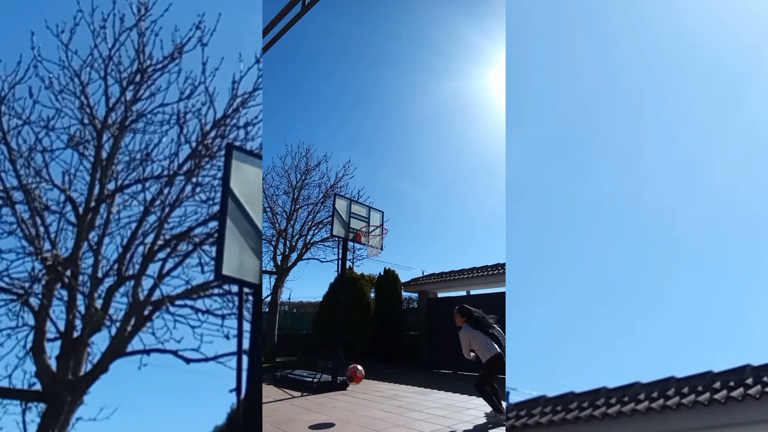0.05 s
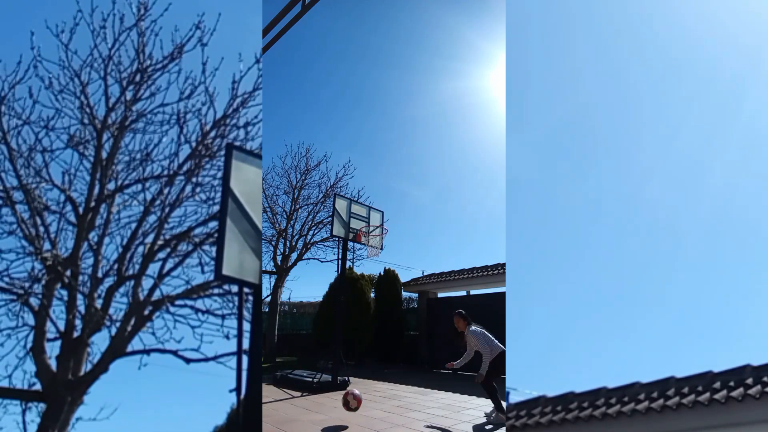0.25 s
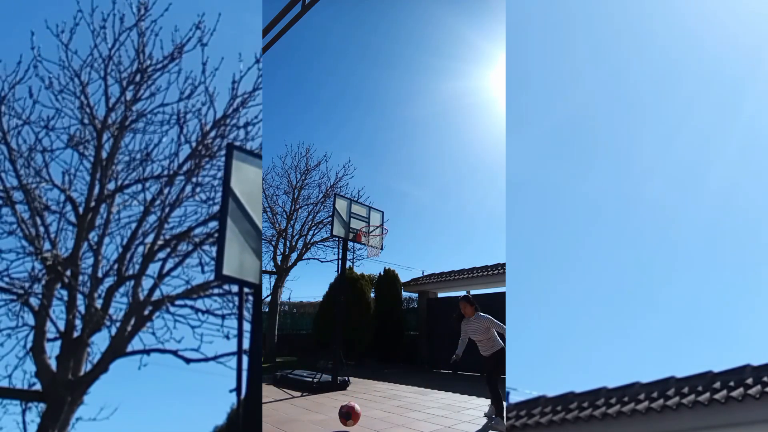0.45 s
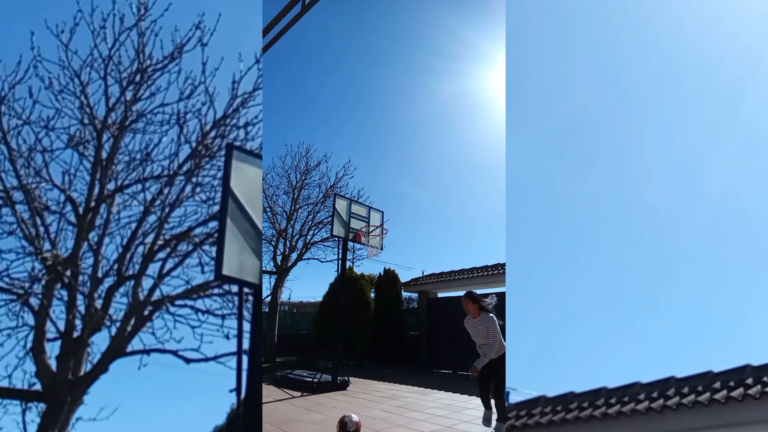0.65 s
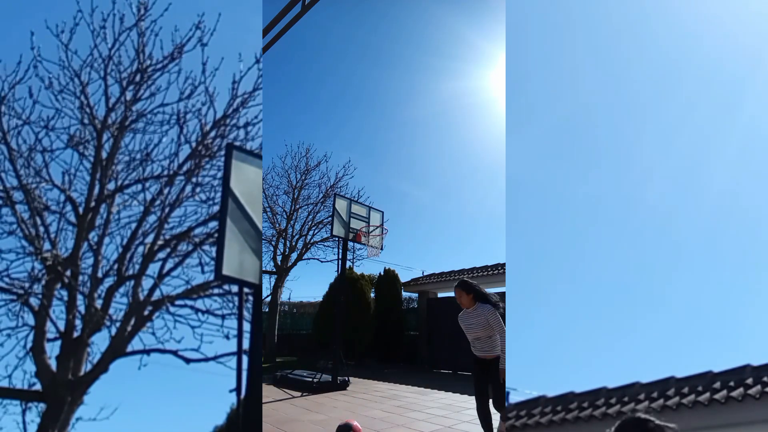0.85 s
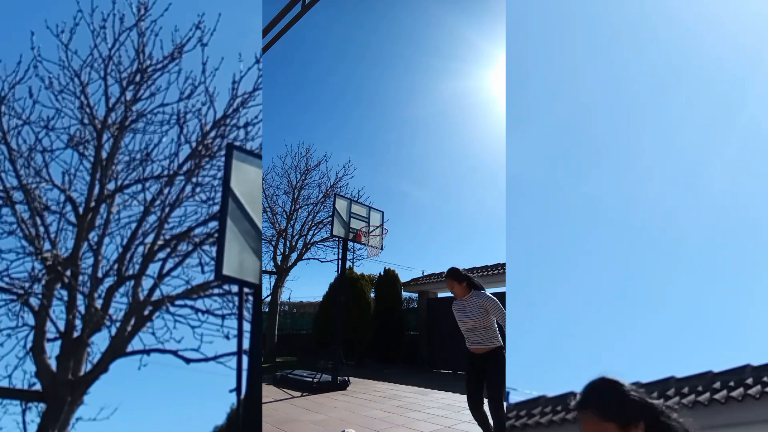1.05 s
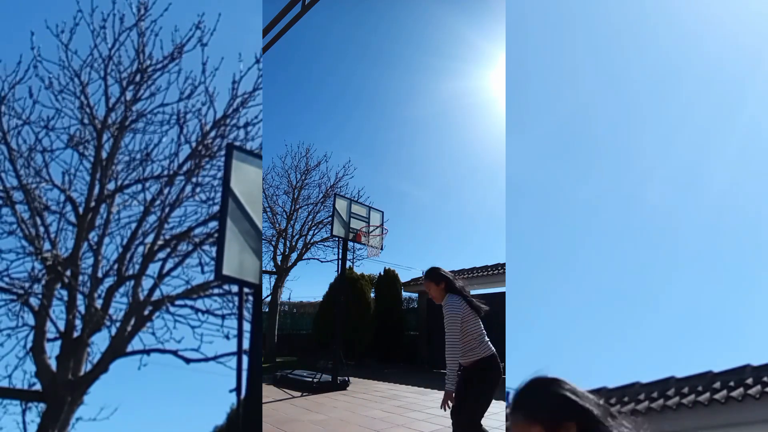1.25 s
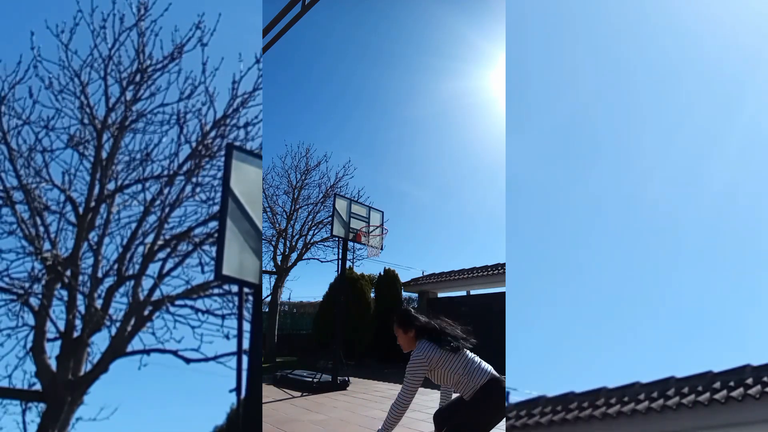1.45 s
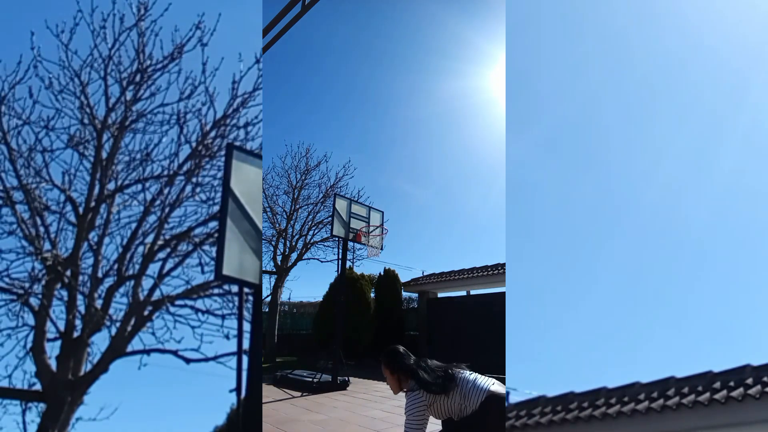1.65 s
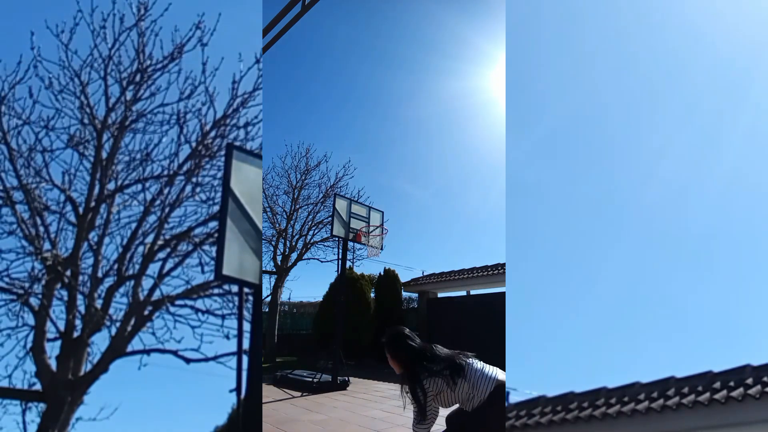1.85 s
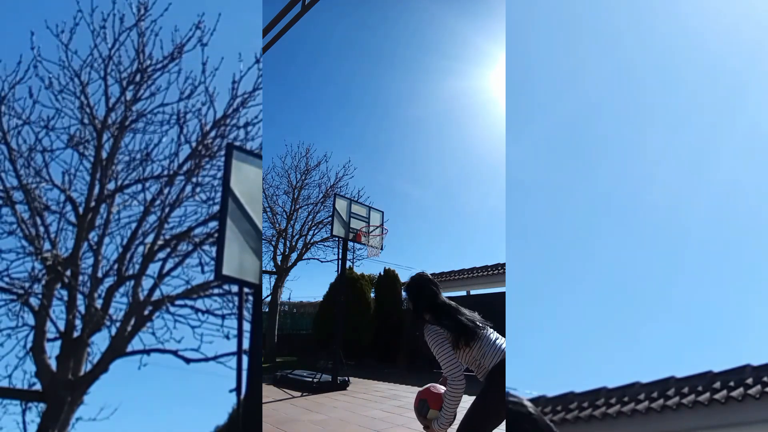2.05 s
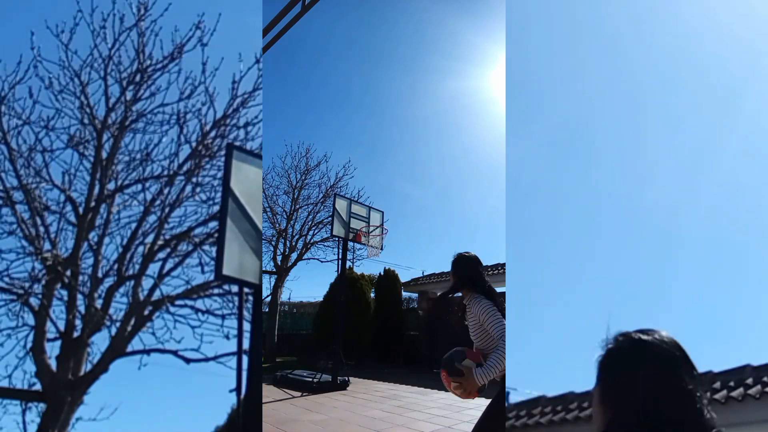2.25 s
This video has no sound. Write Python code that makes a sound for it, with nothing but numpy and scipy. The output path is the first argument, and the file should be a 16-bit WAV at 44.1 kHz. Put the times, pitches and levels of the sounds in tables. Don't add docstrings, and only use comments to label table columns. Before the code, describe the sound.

Basketball bouncing on hard outdoor tiles with quick fading knocks, shoe scuffs, wind rumble and a catch

```python
import sys
import numpy as np
from scipy import signal
from scipy.fft import rfft, irfft
from scipy.io import wavfile
from scipy.ndimage import uniform_filter1d

SR = 44100
rng = np.random.default_rng(int(sys.argv[2]) if len(sys.argv) > 2 else 0)


def put_to_file(sound):
    columns = np.atleast_2d(sound).T
    safe = np.clip(columns, -1, 1)
    whole_steps = np.round(safe * 32767)
    wavfile.write(sys.argv[1], SR, whole_steps.astype(np.int16))


def volts_from_decibels(level):
    exponent = np.asarray(level, float) / 20
    return 10 ** exponent


N = 101429


def curve(rows, t):
    return np.interp(t, *np.array(rows, float).T)


def shaped(points):
    corner_hz, level_db = np.array(points, float).T
    hz = np.maximum(np.fft.rfftfreq(N, 1 / SR), 1)
    colour = volts_from_decibels(np.interp(np.log(hz), np.log(corner_hz), level_db, left=-60))
    x = irfft(rfft(rng.standard_normal(N)) * colour, N)
    return x / x.std()


def band(x, hz, width_hz):
    b, a = signal.iirpeak(hz, hz / width_hz, fs=SR)
    y = signal.lfilter(b, a, signal.lfilter(b, a, x))
    return y / y.std()


def walk(rate):
    k = int(SR / rate)
    steps = np.repeat(rng.standard_normal(N // k + 1), k)
    w = uniform_filter1d(uniform_filter1d(steps, k), k)[:N]
    return w / w.std()


def fade(t, t60):
    return volts_from_decibels(-60 * t / max(t60, .001))


def add(out, s, x):
    i = max(int(s * SR), 0)
    out[i:i + len(x)] += x[:len(out) - i]


# f/Hz, level/dB
HISS_COLOUR = [(100, 0.5), (500, -3), (1430, -11), (3900, -22), (4500, -16.5), (7200, -10), (7900, -33),
               (13500, -34.5)]
# t/s, level/dB
OPENING = [(0, 6), (.045, 5), (.06, 2), (.2, 0.5), (.3, -3.5), (.455, -1.5), (.465, -12), (.518, -11.5),
           (.525, 8.5), (.7, -4.5), (.9, -1), (1.3, -2), (1.66, -0.5), (1.675, -10), (1.75, -12),
           (1.81, 1.5), (1.9, -6.5), (2.05, 1), (2.15, -4), (2.3, -3.5)]
YARD_DB, WHINE_HZ, WHINE_DB = -71, 14800, -96.5


def yard(t):
    hiss, opening = shaped(HISS_COLOUR), curve(OPENING, t)
    low = signal.lfilter(*signal.butter(2, 1500, fs=SR), hiss)
    high = (hiss - low) * volts_from_decibels(1.6 * walk(12))
    high = high + volts_from_decibels(WHINE_DB - YARD_DB) * band(rng.standard_normal(N), WHINE_HZ, 900)
    low = low * volts_from_decibels(1.42 * opening + 2.0 * walk(13))
    return volts_from_decibels(YARD_DB) * (low + high * volts_from_decibels(opening))


# t/s, level/dB
GUST = [(0, -74), (.12, -61.5), (.3, -54), (.45, -87.5), (.49, -104), (.56, -74.5), (.85, -71.5),
        (1.08, -86), (1.15, -68.5), (1.28, -73), (1.4, -52), (1.62, -67), (1.69, -82), (1.75, -89),
        (1.8, -49), (2.02, -59), (2.1, -75), (2.3, -63.5)]
# t/s, level/dB, f/Hz, width/s
BUFFETS = [(0.128, -45.5, 91.6, 0.023), (0.163, -42.5, 100, 0.028), (0.193, -49.5, 114, 0.021),
           (0.226, -32.5, 92, 0.0027), (0.248, -32, 98, 0.019), (0.288, -44, 99, 0.024),
           (0.32, -44, 82.4, 0.021), (0.382, -48, 74, 0.026), (0.431, -53, 68.7, 0.031),
           (1.366, -34, 114, 0.01), (1.433, -44.5, 98.5, 0.0069), (1.455, -36.5, 100, 0.016),
           (1.546, -41, 94, 0.031), (1.593, -40, 80.5, 0.019), (1.613, -41, 111, 0.0106),
           (1.784, -41, 112.3, 0.024), (1.869, -33, 114, 0.012), (1.941, -40, 128, 0.011),
           (1.962, -37, 104.2, 0.048), (1.985, -30.5, 112.4, 0.013), (2.007, -42, 112, 0.0055),
           (2.222, -52, 66, 0.032)]
RUMBLE_HZ, RUMBLE_WIDTH_HZ = 58, 64


def wind(t):
    rumble = band(rng.standard_normal(N), RUMBLE_HZ, RUMBLE_WIDTH_HZ)
    out = volts_from_decibels(curve(GUST, t) + 2 * walk(16)) * rumble
    phases = rng.random(len(BUFFETS))
    for (s, db, hz, width), phase in zip(BUFFETS, phases):
        swell = np.exp(-(2.68 * (t - s) / max(width, .008)) ** 2)
        out = out + volts_from_decibels(db) * swell * np.cos(2 * np.pi * (hz * (t - s) + phase))
    return out


PUSH_S, PUSH_CYCLES = 0.00071, 0.49


def ring(t, modes):
    out = np.zeros(len(t))
    for hz, db, t60 in modes:
        build_up = 1 - np.exp(-t / (PUSH_S + PUSH_CYCLES / hz))
        out += volts_from_decibels(db) * build_up * fade(t, t60) * np.sin(-2 * np.pi * hz * t)
    return out


SCATTER_PER_S, SCATTER_DB, SCATTER_RISE_S = 9000, -20, .02
T60_LOW_S, T60_HIGH_S, SPLIT_HZ = .33, .08, 3000
ECHO_T60_S = 0.047
WALL_HZ, BLUR_S = 4200, 0.0011


def echoes(x, t, end_s, walls):
    chance = rng.random(len(t)) < SCATTER_PER_S / SR
    scatter = chance * rng.standard_normal(len(t)) * np.clip(t / SCATTER_RISE_S, 0, 1) * volts_from_decibels(SCATTER_DB)
    low = signal.lfilter(*signal.butter(1, SPLIT_HZ, fs=SR), scatter)
    slaps = np.zeros(len(t))
    for lag_s, db in walls:
        blur = 0.11 * rng.standard_normal(len(t)) * np.exp(-t / BLUR_S)
        add(slaps, lag_s, volts_from_decibels(db) * ((t == 0) + blur))
    reply = low * fade(t, T60_LOW_S) + (scatter - low) * fade(t, T60_HIGH_S)
    reply = reply + signal.lfilter(*signal.butter(2, WALL_HZ, fs=SR), slaps)
    closing = np.clip((end_s - t) / 0.014 + 1, .1, 1)
    return signal.fftconvolve(x * fade(t, ECHO_T60_S), reply)[:len(t)] * closing


# t/s, level/dB, f/Hz, t60/s, grit level/dB
KNOCKS = [(.038, -50, 627, 0.028, -18.5), (.618, -53, 940, 0.012, -25.5), (.796, -53, 150, 0.12, -9),
          (.839, -39.5, 1250, 0.0072, 0.5), (.862, -49.5, 741, 0.049, -13), (.935, -59, 1360, 0.036, -24),
          (1.105, -45, 223, 0.089, -11), (1.107, -44.5, 743, 0.026, -17), (1.125, -46, 620, 0.028, -11.5),
          (1.25, -43.5, 1174, 0.013, -7), (1.329, -35.5, 339, 0.034, -15), (1.356, -45, 400, 0.022, -14.5),
          (1.453, -47.5, 264, 0.086, -8), (1.482, -45, 500, 0.014, -16), (1.574, -57.5, 2700, 0.017, 3),
          (2.0558, -42, 900, 0.018, -3), (.075, -58, 720, .06, -15), (.0, -58, 1080, .03, -10)]
SOFT_HZ, KNOCK_ECHO_DB, KNOCK_ECHO_S = 3460, -1.5, 0.038


def knocks(grit):
    out, t = np.zeros(N), np.arange(int(.2 * SR)) / SR
    soft = signal.lfilter(*signal.butter(2, SOFT_HZ, fs=SR), grit) + .3 * grit
    soft = soft * volts_from_decibels(3.6 * walk(300))
    for s, db, hz, t60, grit_db in KNOCKS:
        scrape = soft[int(s * SR):][:len(t)] * (1 - np.exp(-t / 0.0027)) * fade(t, 1.74 * t60)
        direct = ring(t, [(hz, 0, t60)]) + volts_from_decibels(grit_db) * scrape
        reply = echoes(direct, t, KNOCK_ECHO_S, [])
        add(out, s, volts_from_decibels(db) * (direct + volts_from_decibels(KNOCK_ECHO_DB) * reply))
    return out


# t/s, level/dB, f/Hz
TICKS = [(.6178, -50, 6000), (.788, -62, 10000), (.8385, -61, 9000), (.8445, -60, 7000), (.8515, -61, 5000),
         (.862, -60, 5500), (.8805, -62, 5000), (.9345, -58, 2200), (.9585, -63, 6900), (.9845, -68, 12000),
         (1.0175, -62, 6300), (1.0265, -58, 5800), (1.0365, -60, 5800), (1.082, -60, 5500),
         (1.099, -61, 4000), (1.108, -54, 3000), (1.187, -62, 2000), (1.574, -57, 3000), (1.251, -65, 4000),
         (1.313, -67, 11500), (1.3765, -64, 6500), (1.4585, -58, 6800), (1.5275, -68, 6000),
         (2.088, -58, 8000), (.2365, -46, 10000), (.5265, -56, 9800), (.543, -62, 10000),
         (2.056, -48, 2500), (.038, -55, 1200)]
TICK_T60_S, TICK_Q = .014, 1.5


def ticks():
    out, t = np.zeros(N), np.arange(int(.03 * SR)) / SR
    for s, db, hz in TICKS:
        click = rng.standard_normal(len(t)) * fade(t, TICK_T60_S)
        b, a = signal.iirpeak(hz, TICK_Q, fs=SR)
        add(out, s, volts_from_decibels(db + 6) * signal.lfilter(b, a, signal.lfilter(b, a, click)))
    return out


# t/s, length/s, level/dB, f/Hz
PIPES = [(.058, 0.065, -64, 2454), (.058, .03, -69, 3230), (0.098, 0.022, -62, 3200),
         (.048, .04, -67, 1800), (.06, .035, -68, 1450), (0.175, 0.04, -65, 3240), (.17, .035, -70, 2520),
         (0.63, .1, -72, 3820), (0.935, 0.12, -74, 3820), (1.215, .08, -75, 3820), (.39, .05, -76, 3820)]


def birds():
    out, waver = np.zeros(N), walk(90)
    for s, length, db, hz in PIPES:
        w = waver[int(s * SR):][:int(length * SR)]
        loudness = volts_from_decibels(db - 9 + 5 * np.sin(3 * w)) * np.hanning(len(w)) ** .5
        cycles = np.cumsum(hz * (1 + .008 * w)) / SR
        add(out, s, loudness * np.sin(2 * np.pi * cycles))
    return out


# f/Hz, level/dB, t60/s
ON_TILE = [(213, 7, 0.045), (401, 7.5, 0.05), (500, 0, .03), (1190, 7.5, 0.022), (1375, 2, .025),
           (2810, -4, 0.02), (3360, -6, 0.032), (4600, -9, .02), (5630, -9, 0.0088), (6310, -3, 0.024),
           (7410, -19.5, 0.061), (8880, -11.5, 0.017)]
ON_KERB = [(339, 8, 0.043), (689, 11, 0.02), (1294, -6.5, 0.083), (2505, 9.5, 0.0086), (3110, 3, 0.015),
           (3365, 1, 0.017), (6900, -32, 0.022)]
ON_POST = [(499, 4.5, 0.09), (1104, 1, 0.06), (1202, 10, 0.031), (1900, -9, 0.08), (2270, 6, 0.025),
           (2650, 0, 0.025), (3370, -10, 0.05), (6900, -12.5, 0.055)]
ON_PALM = [(312, 3, .03), (381, 10.5, 0.03), (454, -4.5, 0.075), (1079, 0.5, 0.031), (2746, -5, .012)]
CAUGHT = [(751, 16.5, 0.0072), (1120, 12.5, 0.0056), (1733, 1.5, 0.0091), (3920, 7.5, 0.0038)]
STRUCK = [ON_TILE, ON_KERB, ON_POST, ON_PALM, ON_PALM, CAUGHT]
# delay/s, level/dB
MIDDLE = [(.010, -9.5), (.020, -4), (.024, -5), (.0305, -4), (.0395, -8), (.049, -12), (.055, -12),
          (.067, -15)]
EDGE = [(.023, -7), (.033, -7), (.043, -12), (.056, -9)]
CORNER = [(.015, -5), (.020, -4), (.036, -6), (.040, -4), (0.050, -8.5)]
PLACES = [MIDDLE, EDGE, EDGE, EDGE, EDGE, CORNER]
# t/s, level/dB, crack level/dB, echo level/dB, time until echoes fade out/s
CONTACTS = [
    (.2165, -30, -0.5, -6, .13),
    (0.5226, -43.5, -3, -3, 0.069),
    (.700, -48, -4.5, -11, 0.049),
    (1.8126, -38, -14, -18, 0.017),
    (1.8269, -41.5, -10, -3, 0.028),
    (2.0587, -28.5, -25, -14, 0.08),
]
FACING = [1, 1, 1, 1, 1, -1]
CRACK_T60_S, GRIT_TAIL_DB, GRIT_TAIL_T60_S = 0.023, -12.5, 0.14


def ball(grit):
    out, t = np.zeros(N), np.arange(int(.24 * SR)) / SR
    for contact, modes, walls, sign in zip(CONTACTS, STRUCK, PLACES, FACING):
        s, db, crack_db, echo_db, end_s = contact
        noise = grit[int(s * SR):][:len(t)]
        direct = sign * ring(t, modes) + volts_from_decibels(crack_db) * noise * fade(t, CRACK_T60_S)
        closing = np.clip((end_s - t) / 0.021 + 1, .1, 1)
        tail = volts_from_decibels(crack_db + GRIT_TAIL_DB) * noise * fade(t, GRIT_TAIL_T60_S) * closing
        reply = volts_from_decibels(echo_db) * echoes(direct, t, end_s, walls)
        add(out, s, volts_from_decibels(db) * (direct + tail + reply))
    return out


# t/s, length/s,
# level/dB, f/Hz
SCUFFS = [(0.795, 0.0047, -49, 7560), (.804, 0.0027, -43.5, 6900), (.809, 0.0076, -54.5, 7000),
          (1.46, .04, -63, 600), (0.934, 0.049, -70, 10550), (.94, 0.062, -81, 13200),
          (0.983, 0.006, -68, 6350), (1.022, 0.014, -71, 10700), (1.33, .045, -63, 700),
          (1.446, 0.04, -64, 4100), (1.446, .035, -69, 9800), (1.575, .04, -77, 10200),
          (.796, .004, -58, 10000), (.804, .012, -60, 9800), (1.08, .02, -72, 9500),
          (2.030, .011, -64, 2620), (2.03, .012, -70, 9800), (2.06, .045, -69, 10000),
          (.53, .065, -72, 9700), (1.105, .04, -60, 900), (.84, .045, -65, 1200), (.26, .06, -60, 2100),
          (2.059, 0.051, -59.5, 5540)]


def scuffs():
    out = np.zeros(N)
    for s, length, db, hz in SCUFFS:
        n = int(length * SR * 1.24)
        rough_db, q = 6, 9.0
        if hz < 9000:
            rough_db, q = 2, 2.2 if hz > 4000 else 1.0
        grain_levels = np.repeat(rng.standard_normal(25), 160)
        grains = rng.standard_normal(4000) * volts_from_decibels(rough_db * grain_levels)
        b, a = signal.iirpeak(hz, q, fs=SR)
        rub = signal.lfilter(b, a, signal.lfilter(b, a, grains))[:n]
        stroke = np.sin(np.pi * np.sqrt(np.arange(len(rub)) / n))
        add(out, s, volts_from_decibels(db + 9) * rub * stroke)
    return out


# f/Hz, level/dB
GRIT_COLOUR = [(150, 11.5), (700, 0.5), (4000, -8.5), (6800, 0), (8000, -17.5), (10000, -6.5),
               (13000, -24.5), (15300, -8.5)]
PORT_DIP_HZ, PORT_DIP_Q = 8400, 4.0


def scene():
    t, grit = np.arange(N) / SR, shaped(GRIT_COLOUR)
    feet = signal.lfilter(*signal.iirnotch(PORT_DIP_HZ, PORT_DIP_Q, fs=SR), scuffs() + ticks())
    return (yard(t) + wind(t) + knocks(grit) + feet + birds() + ball(grit))[None]


def band_limit(x):
    return signal.sosfilt(signal.butter(12, 16640, fs=SR, output="sos"), x)


def record(dry):
    cut = signal.sosfilt(signal.butter(3, 55, "highpass", fs=SR, output="sos"), dry)
    cut = signal.sosfilt(signal.ellip(7, .5, 22, 15600, fs=SR, output="sos"), cut)
    return band_limit(cut)


dry = scene()
out = record(dry)
put_to_file(out)
```